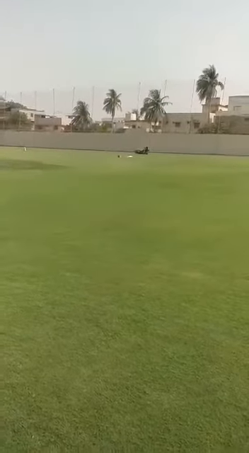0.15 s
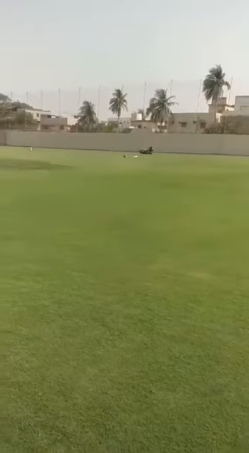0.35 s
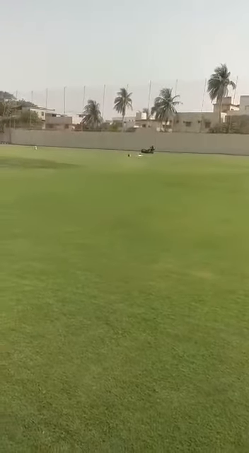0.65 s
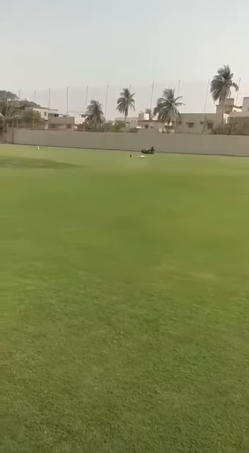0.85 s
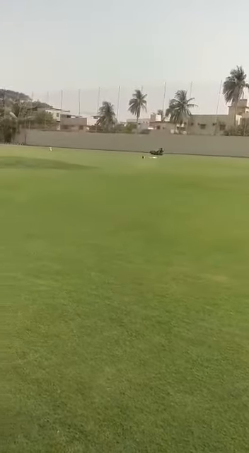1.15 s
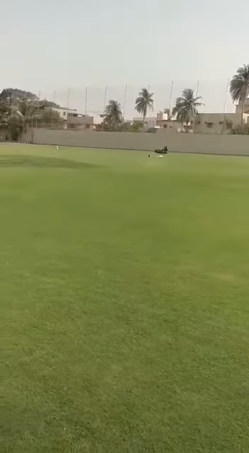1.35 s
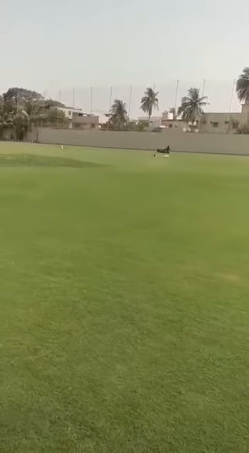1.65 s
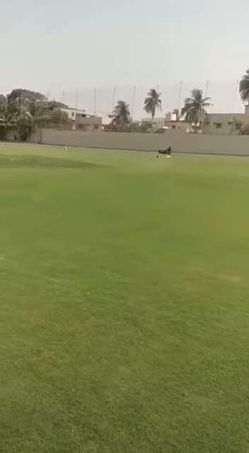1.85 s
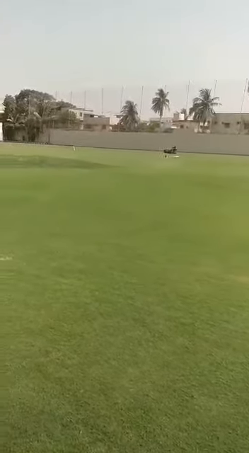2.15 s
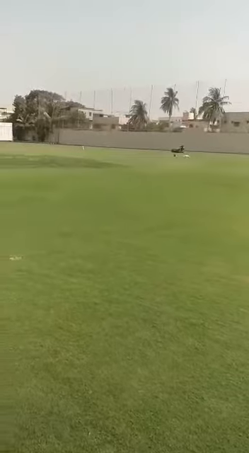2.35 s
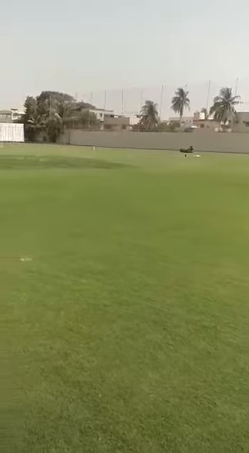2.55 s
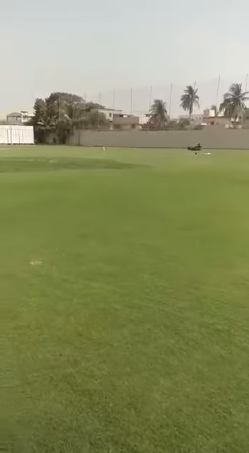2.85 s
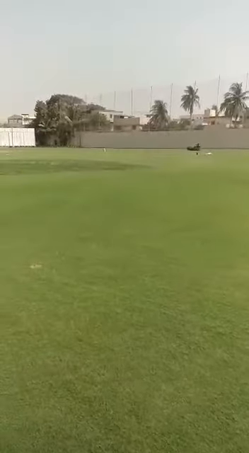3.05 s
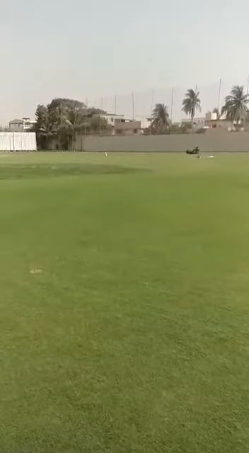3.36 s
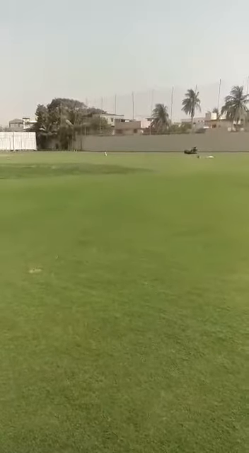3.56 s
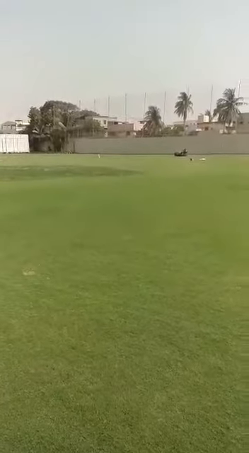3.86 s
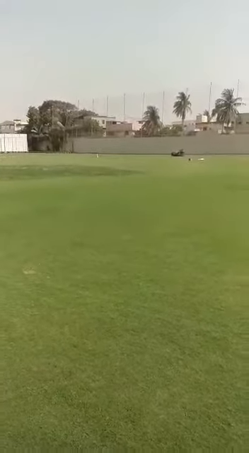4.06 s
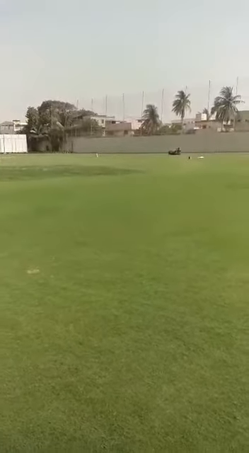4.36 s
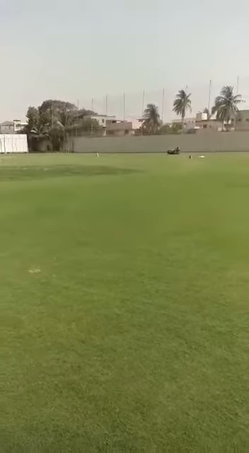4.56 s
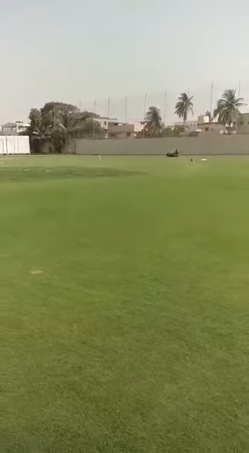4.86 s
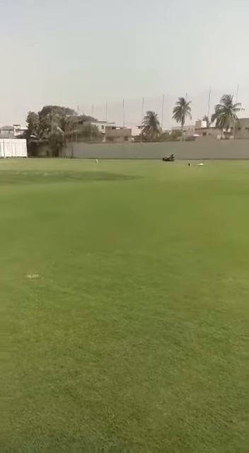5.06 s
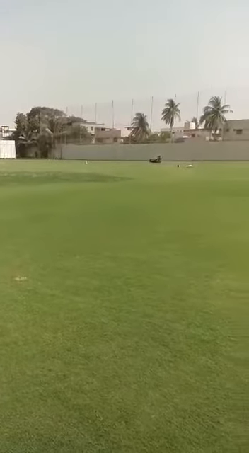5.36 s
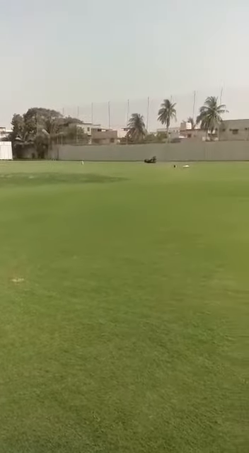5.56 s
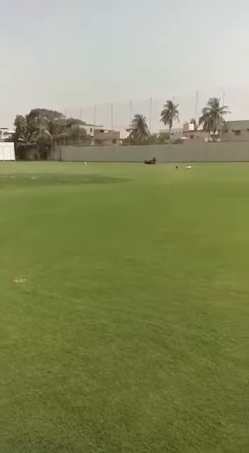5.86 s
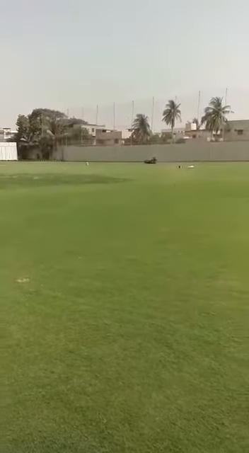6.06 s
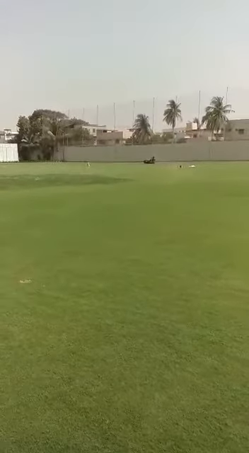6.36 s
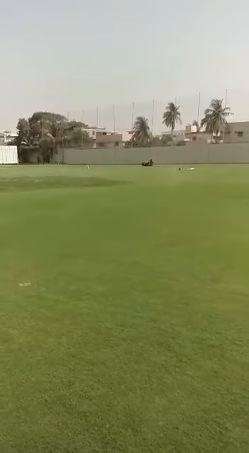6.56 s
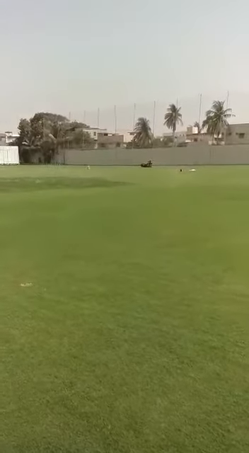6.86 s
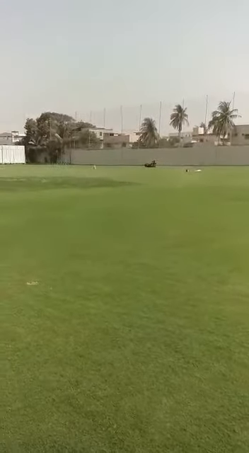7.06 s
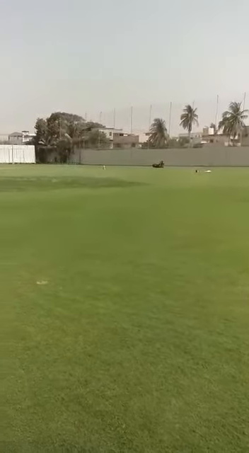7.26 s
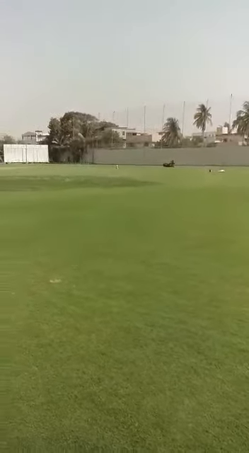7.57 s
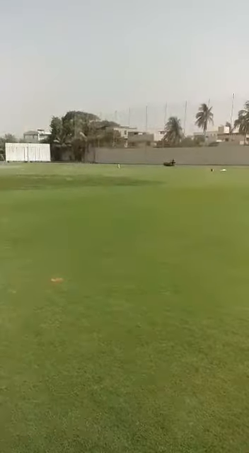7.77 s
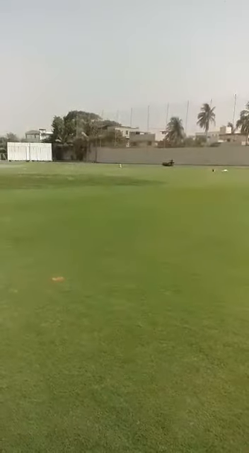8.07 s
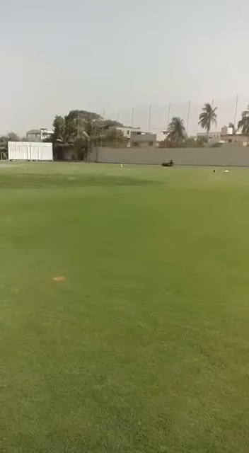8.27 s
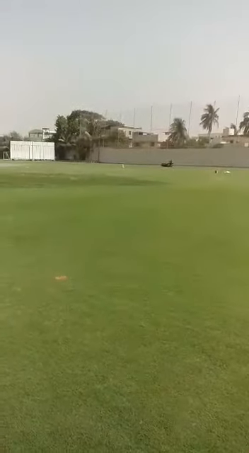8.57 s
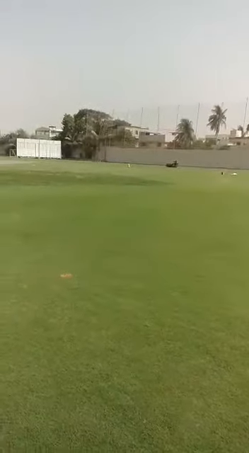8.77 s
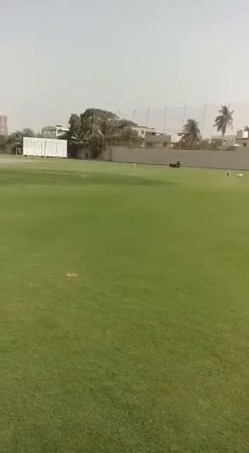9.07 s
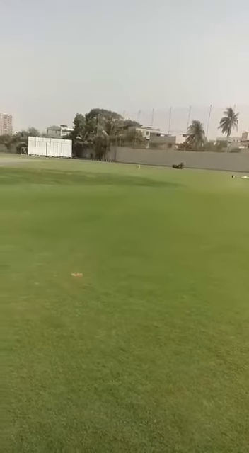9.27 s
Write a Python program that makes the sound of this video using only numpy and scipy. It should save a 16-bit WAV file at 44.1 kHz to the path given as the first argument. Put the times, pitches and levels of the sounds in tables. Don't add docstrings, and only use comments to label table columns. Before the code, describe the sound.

A ride-on mower runs continuously far off over an open grass field, a low throbbing thrum under a wide blade hiss that flutters with the breeze. Wind thumps the microphone at the opening, then mostly eases, exposing small loose-part rattles and faint high squeaks. Gusts return around seven to eight seconds and pound heavily at the end, briefly pushing the mower down in level.

```python
import sys
import numpy as np
from scipy import signal
from scipy.fft import rfft, irfft, next_fast_len
from scipy.io import wavfile
from scipy.ndimage import uniform_filter1d

SR = 44100
rng = np.random.default_rng(int(sys.argv[2]) if len(sys.argv) > 2 else 0)


def boost(x):
    u = np.asarray(x, float) / 20
    return 10 ** u


def master_out(mix):
    frames = np.transpose(np.atleast_2d(mix))
    ceiling = np.clip(frames, -1, 1)
    pcm = np.round(ceiling * 32767).astype(np.int16)
    wavfile.write(sys.argv[1], SR, pcm)


N = 415422

# (multiple of firing rate, level over the thrum [dB])
EXHAUST_ORDERS = [(3, -6.5), (4, -8.5), (5, -9.5), (6, -6.5), (7, -11), (8, -11), (20, -36)]
# (frequency [Hz], level per Hz [dB])
ROAR_COLOUR = [(20, -2), (50, 6), (80, -5.5), (120, 4.5), (170, 5.5), (235, -5.5), (400, -19), (1000, -52)]
# (frequency [Hz], level per Hz [dB])
WASH_COLOUR = [(100, 0), (400, -0.5), (850, -2.5), (3200, -4.5), (7000, -15), (10700, -21.5), (12500, -40),
               (15400, -45)]
# (time [s], treble lift [dB])
BREEZE_TREBLE = [(0.0, 4.5), (0.75, -0.5), (1.1, 0), (1.55, 3.5), (2.15, 3), (2.5, 0), (2.7, 3), (3.05, 1),
                 (3.77, 5), (4.45, 1), (4.8, 3), (5.34, -1.5), (5.97, 3), (6.59, 1.5), (7.35, -3.5),
                 (8.3, 4), (8.95, -1), (9.42, 1)]
# (frequency [Hz], width [Hz], level [dB])
DECK_PANELS = [(583.7, 69, -39.5), (711, 110, -42), (1144, 49, -42), (1298, 115, -38), (1637, 420, -35),
               (2765, 190, -37.5), (4310, 2240, -37.5)]
# (time facing the listener [s], lobes per turn [count], swing [dB])
PANEL_BEAMS = [(2.3, 2.3, 0.5), (1.5, 8, 2), (2.2, 4.5, 0.5), (6.05, 1.65, 3.5), (1.95, 1.3, 2),
               (1.5, 1.26, 2.8), (2.8, 1.3, 1.5)]
# (time [s], peak level [dB], swing [Hz])
WIND_PUFFS = [(0.158, 6.5, 183), (0.175, 5, 214), (0.19, 1, 210), (0.475, -5, 159), (0.743, 2.5, 230),
              (0.79, -6, 148), (1.678, -11.5, 256), (2.728, -22, 167), (3.45, -10.8, 163), (6.984, -2, 75),
              (7.732, -2.5, 189), (7.77, -4, 210), (7.883, -7, 133), (7.963, -7.5, 230), (8.049, -7, 148),
              (8.901, 3.5, 370), (8.912, 1, 200), (8.926, 4, 193), (8.94, -1.5, 170), (8.964, 3.5, 446),
              (8.976, 2, 230), (9.045, 2.5, 135), (9.075, -1, 141), (9.239, -7.5, 224), (9.266, 7, 228),
              (9.298, -5, 303), (9.312, 4.5, 195), (9.333, -5, 340), (9.344, -1, 182), (9.406, -2, 189)]
# (start [s], hold [s], level [dB])
PORT_GUSTS = [(0, 0.11, -25.5), (.145, 0.043, -13.5), (.44, 0.054, -27.5), (.72, .08, -29),
              (6.85, 0.054, -27), (7.72, 0.053, -16), (7.94, 0.11, -24), (8.5, .16, -28.5),
              (8.9, 0.077, -8.5), (9.03, 0.12, -17), (9.2, 0.1, -13), (9.3, 0.051, -5.5),
              (9.39, .05, -13.5)]
# (frequency [Hz], level per Hz [dB])
RUSH_COLOUR = [(40, 1), (90, 14), (200, 2.5), (330, -5.5), (500, -10.5), (900, -24.5), (2000, -61),
               (4000, -90)]
# (start [s], hold [s], level [dB])
CHATTER_BURSTS = [
    (0, .25, -45.5),
    (1.43, .04, -45),
    (1.72, .06, -42),
    (1.9, .18, -41.5),
    (2.27, .06, -41.5),
    (2.49, .05, -44),
    (8.38, .14, -48),
]
# (time [s], peak level [dB], frequency [Hz], 60 dB decay [s])
METAL_SQUEAKS = [
    (1.268, -32, 10110, 0.22),
    (2.905, -35, 6890, 0.45),
    (3.83, -37, 10110, 0.73),
    (5.79, -53, 10110, .8),
]
# (time [s], gain just after [dB])
GAIN_KNOCKS = [(0, -10.5), (0.16, -14.5), (0.3, -13.5), (0.475, -13), (0.744, -9), (1.678, -2.5), (1.95, 1),
               (2.553, -3.5), (2.728, -5), (3.172, -2.5), (3.454, -5), (3.85, -2.5), (4.082, -5),
               (4.45, -3.5), (5.577, -4), (6.05, -3.5), (6.242, -4), (6.65, -1.5), (6.984, -6), (7.728, -8),
               (7.772, -11), (7.96, -10), (8.1, -9.5), (8.901, -12), (8.929, -13.5), (9.075, -13.5),
               (9.266, -12.5), (9.345, -13.5), (9.406, -14)]
# (frequency [Hz], margin [dB])
DROPOUT_MARGIN = [(2500, 13.5), (5200, 16.5), (7900, 12), (10700, 9), (13200, 5)]
# (frequency [Hz], level under the signal [dB])
STEREO_GRIT = [(400, -25), (2000, -11), (9000, -7)]


def exhaust():
    firing_hz = 28.9
    turns = np.cumsum(firing_hz * (1 + 0.01126 * drift(0.3, 5))) / SR
    orders = np.zeros(N)
    for multiple, db in EXHAUST_ORDERS:
        fading = boost(db + 3.47 * drift(1.5, 14))
        phase = multiple * turns + 0.16 * drift(0.98, 14) + rng.random()
        orders += fading * np.sin(2 * np.pi * phase)
    roar = rumble(ROAR_COLOUR) * boost(2.05 * drift(5, 40))
    swell_db = -0.4 * drift(0.402, 2)
    return boost(-20.5 + swell_db) * (boost(-1.0) * roar + orders)


def deck():
    treble_db = curve(BREEZE_TREBLE) + 0.75 * drift(6, 30)
    wash = boost(-26.5) * noise(WASH_COLOUR, 0.66, treble_db)
    shake = rng.standard_normal(N)
    t = np.arange(N) / SR
    turn_rad_per_s = 0.521
    rings = np.zeros(N)
    for (hz, width, db), (facing_s, lobes, swing_db) in zip(DECK_PANELS, PANEL_BEAMS):
        beam_db = swing_db * np.cos(lobes * turn_rad_per_s * (t - facing_s))
        rings += boost(db + beam_db + 1.3 * drift(1.5, 12)) * resonate(shake, hz, width)
    return (wash + rings) * boost(0.37 * drift(3, 30))


def wind():
    gust_db = bursts(PORT_GUSTS, rise_s=0.011, fade_db_per_s=350, rest_db=-39.5)
    rush = rumble(RUSH_COLOUR) * boost(gust_db + 2.5 * drift(15, 90))
    shoves = list(WIND_PUFFS) + small_eddies(gust_db)
    out = np.zeros(N + 4000)
    for s, db, hz in shoves:
        out[round(s * SR):][:3000] += boost(db) * diaphragm_shove(hz)
    return out[1000:N + 1000] + rush


def small_eddies(gust_db):
    count, gap_s = 900, 0.012
    late = rng.random(count)
    size, pitch = rng.standard_normal((2, count))
    at = (np.arange(count) + 0.25 * late) * gap_s
    level = np.interp(at, np.arange(N) / SR, gust_db) + 3.5 + 0.5 * size
    swing_hz = 216 * np.exp(0.25 * pitch)
    return [row for row in zip(at, level, swing_hz) if row[1] > -24 and 0 < row[0] < N / SR]


def diaphragm_shove(hz):
    cycles = np.arange(-1000, 2000) / SR * hz
    envelope = np.exp(-(cycles / np.where(cycles < 0, 0.45, 0.8)) ** 2)
    swing = envelope * np.cos(2 * np.pi * (cycles + 0.22 * rng.random() - 0.2))
    crest = np.exp(-abs(cycles + 0.049) / 0.2) - 0.2 * np.exp(-(cycles / 0.13) ** 2)
    return swing + 0.6 * crest


def chatter():
    level_db = bursts(CHATTER_BURSTS, rise_s=0.06, fade_db_per_s=130, rest_db=-59)
    return boost(level_db + 2.5 * drift(10, 50)) * resonate(rng.standard_normal(N), hz=6395, width=170)


def squeaks():
    out = np.zeros(N)
    age = np.arange(0, 0.13, 1 / SR)
    edges = signal.windows.tukey(len(age), 0.15)
    for s, db, hz, t60 in METAL_SQUEAKS:
        tone = boost(db - 60 * age / t60) * edges * np.sin(2 * np.pi * hz * age)
        out[round(s * SR):][:len(age)] += tone
    return out


def evened(x):
    return x / np.sqrt(np.mean(x ** 2) + 1e-20)


def read(points, hz):
    f, value = np.transpose(points)
    return np.interp(np.log(hz + 1), np.log(f + 1), value)


def curve(rows):
    s, value = np.transpose(rows)
    return np.interp(np.arange(N) / SR, s, value)


def drift(low_hz, high_hz):
    t = np.arange(0, N + 128, 128) / SR
    hz = np.geomspace(low_hz, high_hz, num=20)[:, None]
    slow = np.sin(2 * np.pi * (hz * t + rng.random(hz.shape))) / np.sqrt(hz)
    return np.interp(np.arange(N) / SR, t, evened(slow.sum(axis=0)))


def smooth(x, size_0, size_1):
    return uniform_filter1d(uniform_filter1d(x, size=size_0, axis=-2), size=size_1, axis=-1)


def rumble(colour):
    size = next_fast_len(N)
    shape = boost(read(colour, np.fft.rfftfreq(size, 1 / SR)))
    return evened(irfft(rfft(rng.standard_normal(size)) * shape, size)[:N])


def noise(colour, patchy_db, tilt_db):
    frames = N // 256 + 5
    hz = np.fft.rfftfreq(1024, 1 / SR)
    a, b, patches = rng.standard_normal((3, 513, frames))
    patches = evened(smooth(patches, 28, 20))
    treble = np.clip(np.log(hz / 3600 + 1e-9) / 0.72, 0, 1.7)[:, None]
    frame_at = np.clip(np.arange(frames) * 256 - 256, 0, N - 1)
    tilt = treble * tilt_db[frame_at]
    level_db = read(colour, hz)[:, None] + patchy_db * (1 + 1.4 * treble) * patches + tilt
    z = (a + 1j * b) * boost(level_db)
    return evened(signal.istft(z, nperseg=1024, noverlap=768)[1][:N])


def resonate(x, hz, width):
    r = np.exp(-np.pi * width / SR)
    pole = [1, 0, 0, 1, -2 * r * np.cos(2 * np.pi * hz / SR), r * r]
    return evened(signal.sosfilt([pole, pole], np.diff(x, prepend=0)))


def bursts(rows, rise_s, fade_db_per_s, rest_db):
    s, hold, db = np.transpose(rows)[:, :, None]
    t = np.arange(0, N + 64, 64) / SR
    rise_db = 20 * (s - t) / rise_s
    fade_db = fade_db_per_s * (t - s - hold)
    level = db - np.maximum(rise_db, fade_db).clip(0)
    return np.interp(np.arange(N) / SR, t, np.maximum(level.max(axis=0), rest_db))


def gain_control():
    full_db, recover_db_per_s, knock_s = -1.4, 11.0, 0.009
    s, db = np.transpose(GAIN_KNOCKS)[:, :, None]
    t = np.arange(0, N + 32, 32) / SR
    climb = np.where(t >= s, db + recover_db_per_s * (t - s), full_db).min(axis=0)
    width = max(round(knock_s * SR / 32), 1)
    climb = uniform_filter1d(np.minimum(climb, full_db), size=width, mode="nearest")
    return boost(np.interp(np.arange(N) / SR, t, climb))


def stereo_dropouts(pair):
    total_apart = np.array([pair[0] + pair[1], pair[0] - pair[1]]) / 2
    z = signal.stft(total_apart, nperseg=1024, noverlap=512)[2]
    hz = np.fft.rfftfreq(1024, 1 / SR)
    power = smooth(abs(z) ** 2, 5, 3) + 1e-20
    wander_db = 3.5 * evened(smooth(rng.standard_normal(z.shape), 10, 5))
    margin_db = read(DROPOUT_MARGIN, hz)[:, None]
    keep = 10 * np.log10(power / power[::-1]) + margin_db + wander_db > 0
    keep[:, :16] = True
    a, b = rng.standard_normal((2,) + z.shape)
    grit = boost(read(STEREO_GRIT, hz))[:, None]
    z = z * (1 + grit * (a + 1j * b)) / np.sqrt(1 + grit ** 2)
    total, apart = signal.istft(z * keep, nperseg=1024, noverlap=512)[1][:, :N]
    return np.array([total + apart, total - apart])


def scene():
    return np.tile(exhaust() + deck() + wind() + chatter() + squeaks(), (2, 1))


def top_cut(x):
    return signal.sosfilt(signal.butter(12, 15640, fs=SR, output="sos"), x)


def record(dry):
    size = next_fast_len(N + 4096)
    hz = np.fft.rfftfreq(size, 1 / SR)
    overloaded = 0.92 * np.tanh(dry[0] * gain_control() / 0.98)
    bass_cut = 1 / (1 + (65 / (hz + 1)) ** 2.8)
    left = rfft(overloaded, size) * (hz < 15450) * bass_cut
    late_samples = 15.9
    delay = np.exp(-2j * np.pi * hz * late_samples / SR)
    right = -left * boost(-0.2) / (1 + 1j * hz / 4700) * delay
    pair = irfft(np.array([left, right]), size)[:, :N]
    mix = stereo_dropouts(pair)
    return top_cut(mix)


dry = scene()
out = record(dry)
master_out(out)
```